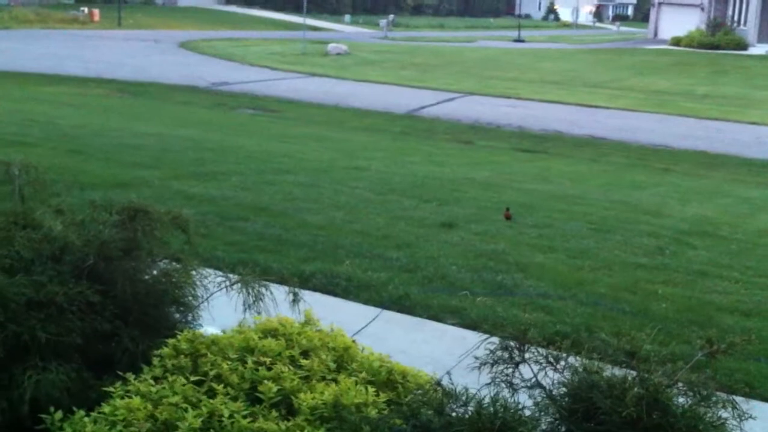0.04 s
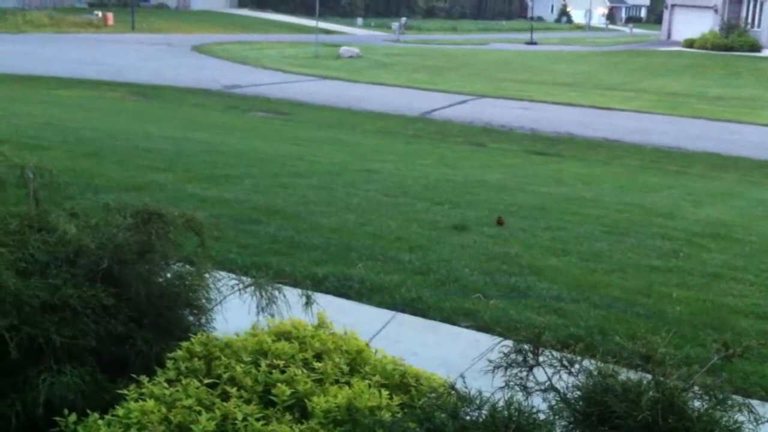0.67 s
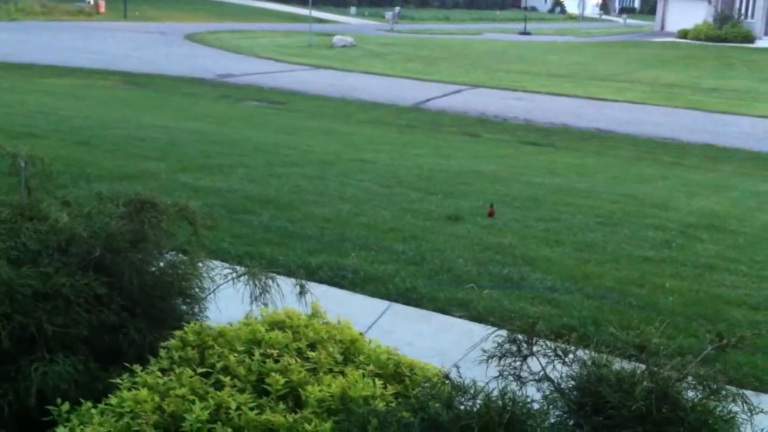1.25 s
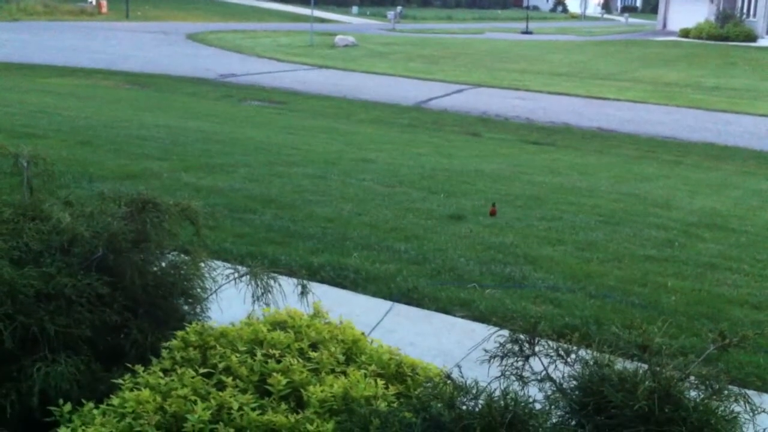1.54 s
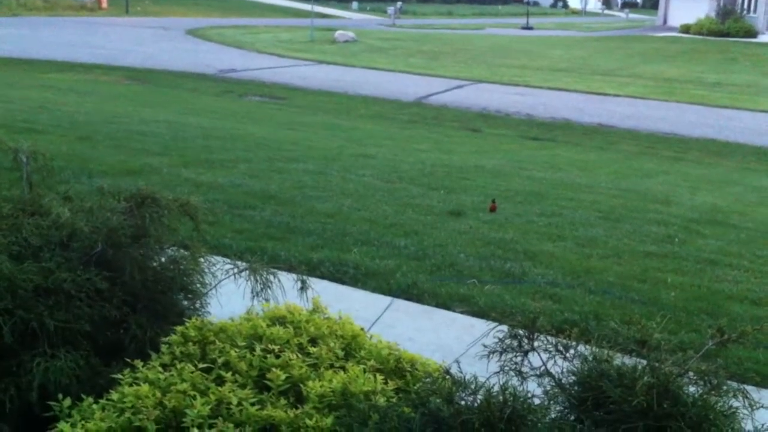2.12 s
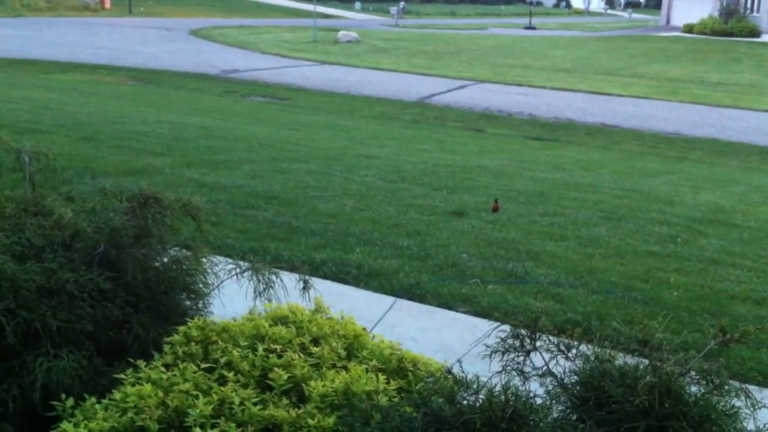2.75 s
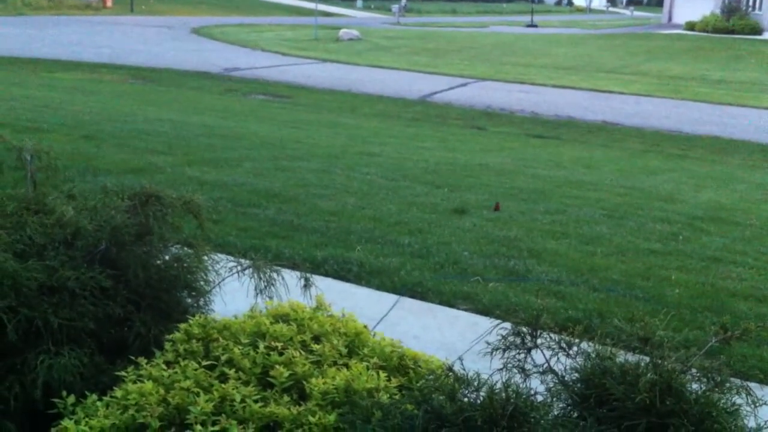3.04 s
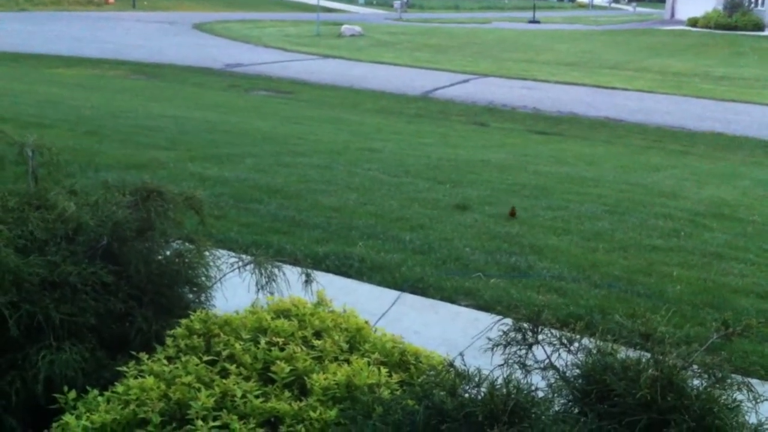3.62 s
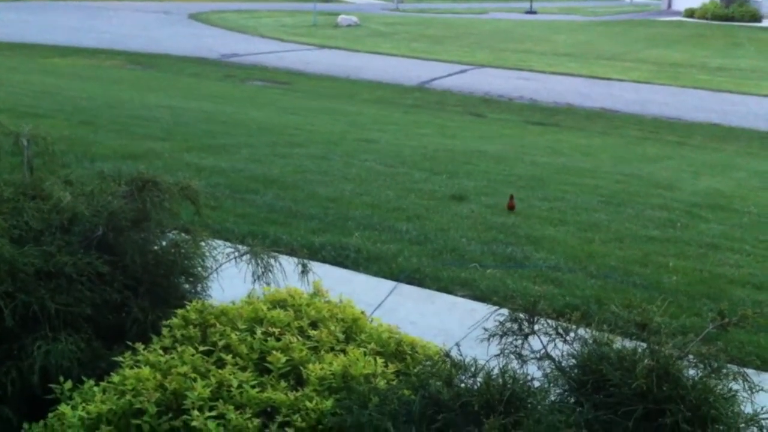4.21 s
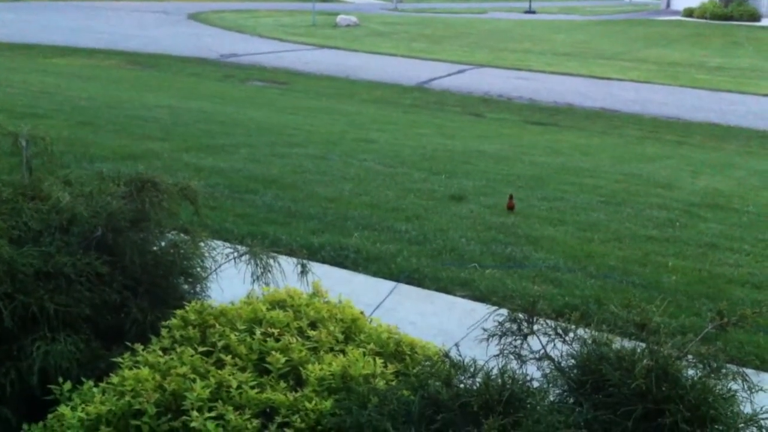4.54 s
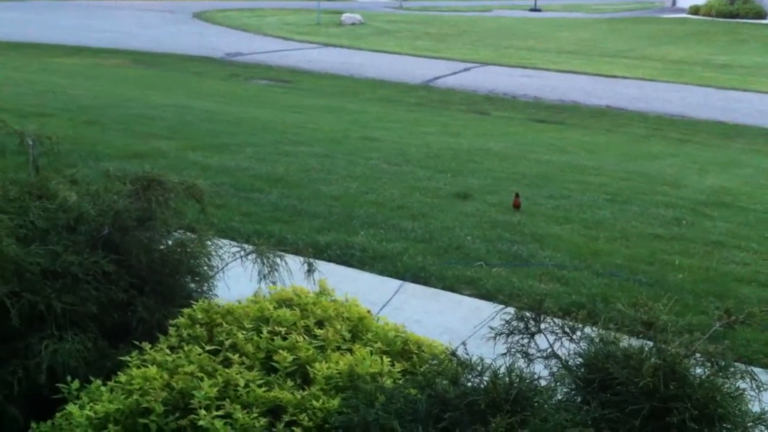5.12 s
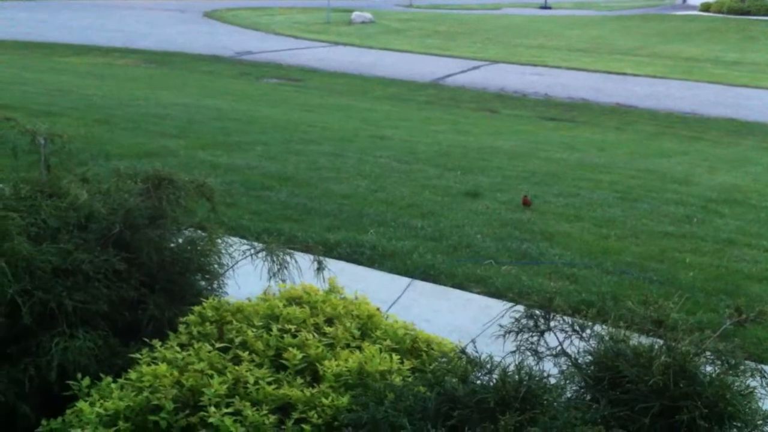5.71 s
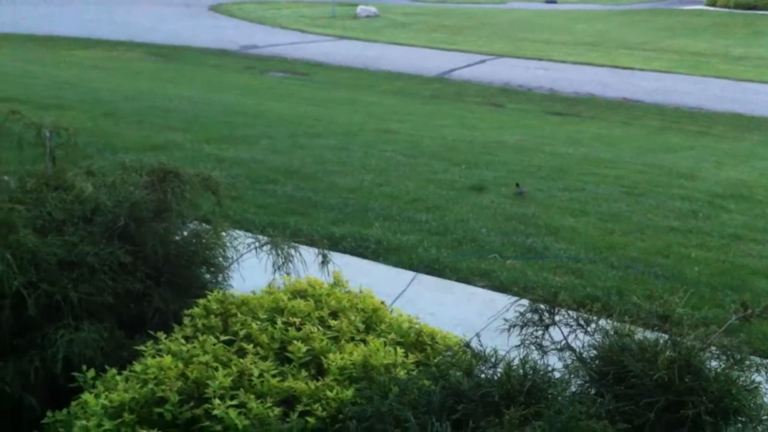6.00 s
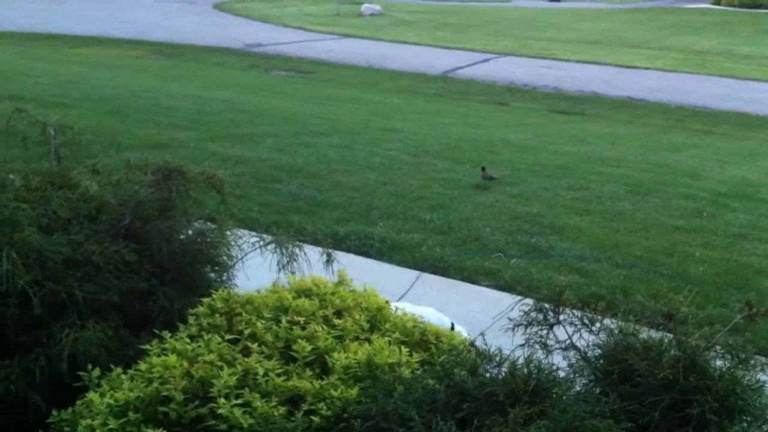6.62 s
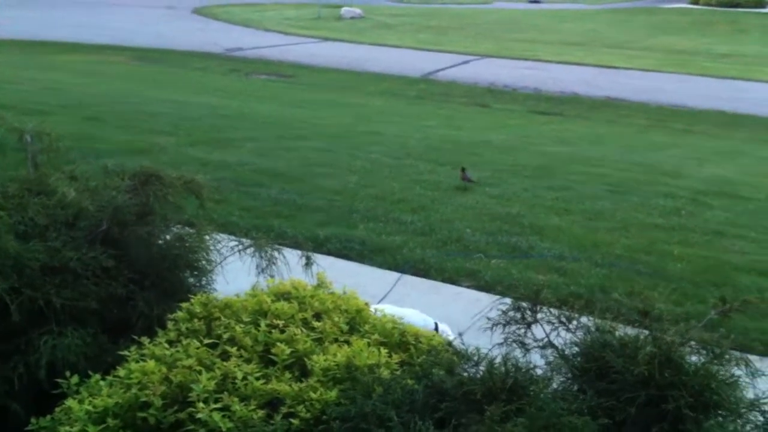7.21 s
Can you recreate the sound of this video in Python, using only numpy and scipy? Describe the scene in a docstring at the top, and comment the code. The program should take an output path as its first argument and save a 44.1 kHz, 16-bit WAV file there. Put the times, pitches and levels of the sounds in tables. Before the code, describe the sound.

A robin gives sharp, high scolding calls and softer low clucks over a faint outdoor hush, with a few small metallic ticks.

```python
"""An outdoor hush comes first, with far traffic, far birds, a machine hum and a faint whine in it.
Over it a robin on a lawn scolds with five sharp "peek" calls and softer, low "tuk" notes. The two sides
of its syrinx oscillate at separate pitches; walls, shrubs and far house fronts reflect the sound.
Now and then a small metal part on a handheld device ticks and rings in its natural modes,
and near the end a finger bumps the device's body with a dull thud."""
import sys
import numpy as np
from scipy import signal
from scipy.fft import rfft, irfft, next_fast_len
from scipy.io import wavfile
from scipy.ndimage import map_coordinates

SR = 44100
rng = np.random.default_rng(int(sys.argv[2]) if len(sys.argv) > 2 else 0)


def store_wav(level_fs):
    """Save 16-bit WAV to argv[1]."""
    pcm = np.round(np.clip(np.atleast_2d(level_fs), -1, 1) * 32767)
    wavfile.write(sys.argv[1], SR, pcm.T.astype(np.int16))


N = 324576
TIME_S = np.arange(N) / SR


def amp(db):
    """Decibels to amplitude ratio."""
    return 10 ** (np.asarray(db) / 20)

def unit(x):
    """Scale to rms 1."""
    return x / np.sqrt(np.mean(x ** 2) + 1e-20)

def along(points, hz):
    """Interpolate (frequency_hz, value) points on a log frequency axis."""
    knots_hz, values = np.transpose(points)
    return np.interp(np.log(hz + 1), np.log(knots_hz + 1), values)

def curves(rows, t):
    """Interpolate each column after the first at the times t."""
    times, *columns = np.transpose(rows)
    return [np.interp(t, times, column) for column in columns]

def filtered(x, response):
    """Linear filtering: multiply the spectrum by a frequency response."""
    size = next_fast_len(len(x) + SR // 4)
    return irfft(rfft(x, size) * response(np.fft.rfftfreq(size, 1 / SR)), size)[:len(x)]

def coloured(x, colour):
    """Filter by a (frequency_hz, gain_db) curve."""
    return filtered(x, lambda hz: amp(along(colour, hz)))

def noise(colour, size):
    """Spectrally shaped noise of rms 1."""
    return unit(coloured(rng.standard_normal(size), colour))

def band(centre_hz, width_hz):
    """Noise of rms 1 through one resonance."""
    return unit(filtered(rng.standard_normal(N), lambda hz: 1 / (1 + ((hz - centre_hz) / width_hz) ** 2)))

def wobble(rate, size=N):
    """A smooth random curve with `rate` knots a second."""
    knots = rng.standard_normal(int(size * rate / SR) + 4)
    return map_coordinates(knots, [np.arange(size) * rate / SR])

def swell(t, centre_s, width_s):
    """A Gaussian rise and fall of height 1."""
    return np.exp(-((t - centre_s) / width_s) ** 2)

def phase_of(hz):
    """Phase is the time integral of frequency."""
    return 2 * np.pi * np.cumsum(hz) / SR

def add(track, start_s, x):
    """Superpose x on the track from start_s on."""
    start = max(round(start_s * SR), 0)
    track[start:start + len(x)] += x[:N - start]


# Spectrum of the outdoor air: frequency_hz, density_db
HUSH_SPECTRUM = [(15, -56), (25, -25), (37, -30.5), (96, -13.5), (144, -6.5), (183, -7.5), (600, -10.5),
                 (1270, -17), (3850, -22), (4770, -20), (5460, -22), (15600, -26.5)]

def hush():
    """Stationary broadband noise, strongest in the bass."""
    return amp(-66) * noise(HUSH_SPECTRUM, N)

# Loudness of a machine: time_s, level_db
HUM_LEVELS = [(0, -76), (4.5, -77.5), (5.0, -68.5), (5.6, -71.5), (6.3, -65.5), (7.36, -68.5)]

def machine_hum():
    """One low tone, slowly modulated in amplitude and frequency, swells late on."""
    hz = np.interp(TIME_S, [5.6, 6.5], [156, 158.3]) * (1 + 0.0022 * wobble(3.8))
    return amp(curves(HUM_LEVELS, TIME_S)[0] + wobble(4.0)) * np.sin(phase_of(hz))

def distant_tone(hz, waver, width_hz):
    """Multipath propagation smears a wavering tone into a narrow band of rms 1."""
    phase = phase_of(hz * (1 + waver * wobble(13)))
    return unit(wobble(width_hz) * np.sin(phase) + wobble(width_hz) * np.cos(phase))

def far_birds():
    """Twittering blurs over many paths into a high, flickering band."""
    return amp(-83 + 1.5 * wobble(19)) * distant_tone(4720, waver=0.022, width_hz=450)

# Glide of a far whine: time_s, pitch_hz, level_db
WHINE_GLIDE = [(.6, 2440, -92), (1.3, 2400, -85), (1.8, 2210, -78.5), (2.3, 2080, -85), (3.0, 2070, -100)]

def far_whine():
    """A faint falling tone, blurred by multipath propagation."""
    hz, db = curves(WHINE_GLIDE, TIME_S)
    return amp(db) * distant_tone(hz, waver=0.0087, width_hz=290)

# Far vehicles going by: centre_s, half_width_s, engine_db, tyre_db
VEHICLES = [(1.9, 0.43, -72.5, -90.5), (4.4, 0.33, -75.5, -114), (5.4, 0.23, -91, -69)]

def traffic():
    """Band-limited noise: a narrow engine drone and a wider tyre rush swell as vehicles pass."""
    drone = rush = amp(-81.5)
    for centre_s, width_s, engine_db, tyre_db in VEHICLES:
        nearness = swell(TIME_S, centre_s, width_s)
        drone = drone + amp(engine_db) * nearness
        rush = rush + amp(tyre_db) * nearness
    engines = drone * band(centre_hz=138, width_hz=7.3)
    tyres = rush * amp(1.1 * wobble(2.55)) * band(centre_hz=224, width_hz=83)
    return engines + tyres


# Contacts of the metal part: start_s, ring_gain_db, click_gain_db
CONTACTS = [(0.013, -75, -66), (.819, -51.5, -69), (1.043, -59, -69), (3.7255, -80, -71),
            (5.944, -36, -54.5), (6.0502, -40.5, -51.5)]
# Its natural modes: frequency_hz, relative_db, t60_s
METAL_MODES = [(7020, -31, .3), (12003, -5, 0.11), (12180, -6, 0.032)]
# Spectrum of a contact: frequency_hz, relative_db
CLICK_SPECTRUM = [(1500, -13), (5000, -2), (9000, -3), (12000, 6), (13200, -11), (15500, -10)]

def metal_ticks():
    """Impact excitation: each contact clicks and sets off exponentially decaying modes."""
    out, t = np.zeros(N), np.arange(SR // 3) / SR
    for start_s, ring_db, click_db in CONTACTS:
        ring = sum(amp(db - 60 * t / t60) * np.sin(2 * np.pi * hz * t) for hz, db, t60 in METAL_MODES)
        click = noise(CLICK_SPECTRUM, len(t)) * (amp(-60 * t / 0.015) + amp(-7 - 60 * t / 0.32))
        add(out, start_s, amp(ring_db) * ring + amp(click_db) * click)
    return out


def pitch_arch(side, t, creep_hz_per_s=4914, flick_s=0.003, slump_s=0.00243):
    """Tension sets pitch: it sweeps up, creeps, flicks to the top at t = 0 and plunges."""
    lead_s, rest_hz, held_hz, rise_s, flick_hz, plunge_s = side
    before, after = np.minimum(t, 0), np.maximum(t, 0)
    tension = np.tanh(np.maximum(before + lead_s, 0) / rise_s)
    sweep_hz = rest_hz + tension * (held_hz + creep_hz_per_s * before - rest_hz)
    slump = 1 - 0.16 * (1 - np.exp(-after / slump_s))
    return (sweep_hz + flick_hz * np.exp(before / flick_s)) * np.exp(-after / plunge_s) * slump

def roughened(hz, db, roughness, jitter, flutter_db):
    """Roughness is fast random modulation of pitch and level; returns amplitude and phase."""
    phase = phase_of(hz * (1 + jitter * roughness * wobble(1400, len(hz))))
    return amp(db + flutter_db * roughness * wobble(703.5, len(hz))), phase

# Response of throat and beak: frequency_hz, gain_db
VOCAL_TRACT = [(1400, -30), (1900, -26.5), (2600, -29), (3300, -17.5), (4000, -6.5), (5000, 0.5),
               (5600, -6), (6400, -17.5), (8200, -11), (9000, -11.5)]

def peek_voice(hz, t, lead_s, gain_db, roughness, attack_db_per_s=1491, release_db_per_s=2600):
    """Source and filter: the tone is loudest where it crosses the throat's resonance."""
    attack_db = attack_db_per_s * np.minimum(t + lead_s, 0)
    release_db = -release_db_per_s * np.maximum(t - 0.027, 0)
    db = -25 + gain_db + attack_db + release_db + along(VOCAL_TRACT, hz)
    slackness = np.interp(hz, [2060, 4280], [0.85, 0.06])  # rough when slack, clean when taut
    roughness = np.clip(roughness + slackness + 0.31 * (t > 0), 0, 1)  # rougher in the plunge
    return roughened(hz, db, roughness, jitter=0.0956, flutter_db=6.5)

# Arch of the syrinx's low side: lead_s, rest_hz, held_hz, rise_s, flick_hz, plunge_s
LOW_ARCH = (.051, 2150, 5170, .0092, 400, .054)

def low_whistle(t, drift_hz_per_s=30000, collapse_s=0.026):
    """The main oscillator drifts up before its sweep; loss of tension steepens its plunge."""
    drift_hz = drift_hz_per_s * np.minimum(t + LOW_ARCH[0], 0)
    collapse = 1 - 0.378 * np.clip(t / collapse_s, 0, 1) ** 4
    hz = np.maximum((pitch_arch(LOW_ARCH, t) + drift_hz) * collapse, 1)
    return peek_voice(hz, t, lead_s=0.063, gain_db=-1, roughness=0)

# Arch of the syrinx's high side: lead_s, rest_hz, held_hz, rise_s, flick_hz, plunge_s
HIGH_ARCH = (.0545, 3850, 8430, .0098, 610, .0215)

def high_whistle(t, stutter_s=0.0062, sag_db_per_s=97):
    """An onset transient: the upper oscillator makes false upsweeps, carries one through, then tires."""
    since = t + HIGH_ARCH[0]
    restarted = np.where(since < 0, since % stutter_s - HIGH_ARCH[0], t)
    gain_db = 1.5 * swell(since, stutter_s / 2, stutter_s) - sag_db_per_s * since
    return peek_voice(pitch_arch(HIGH_ARCH, restarted), t, lead_s=0.051, gain_db=gain_db, roughness=0.043)

# Sharp calls: top_s, pitch_ratio, length_ratio, rise_db, hold_db, fall_db, upper_voice_db
PEEK_CALLS = [(.272, 0.99, 1.03, -2, 0, -1.5, -2), (2.9363, 0.99, 0.96, -4.5, 1, -2, -3),
              (4.4566, 1.008, 0.93, -2, 1, -2, 0), (6.384, 1.002, 1.07, -2.5, 3.5, -6, -4),
              (7.049, .99, 1.03, -2, 1, -3, -0.5)]
# Rasps that open and close a call: offset_from_top_s, level_db, half_width_s
RASP_BURSTS = [(-.052, -40, 0.01), (.008, -41, 0.0068)]
# Spectrum of the rasp: frequency_hz, relative_db
RASP_SPECTRUM = [(1200, -17.5), (1800, -10), (3100, -14), (4200, 8.5), (5600, 11.5), (7000, 0.5),
                 (8300, -7), (9800, -26), (11800, 1), (13500, -32), (15500, -8.5)]

def peeks():
    """Nonlinear coupling of two arching tones adds harmonics and sum and difference tones."""
    out, clock = np.zeros(N), np.arange(-SR // 10, SR // 20) / SR
    for top_s, pitch, length, rise_db, hold_db, fall_db, upper_db in PEEK_CALLS:
        t = np.where(clock < 0, clock / length, clock)  # the arch varies in length, the plunge does not
        low_amp, low = low_whistle(t)
        high_amp, high = high_whistle(t)
        low, high = pitch * low, pitch * high  # scaling phase transposes the voices
        high_amp = high_amp * amp(upper_db)
        tones = low_amp * np.sin(low) + high_amp * np.sin(high)
        harmonics = low_amp * (amp(-31) * np.sin(2 * low) + amp(-34) * np.sin(3 * low))
        coupling = low_amp * high_amp / (low_amp + high_amp)
        combination = (amp(-14.5) * np.sin(low + high) + amp(-18) * np.sin(2 * high - low)
                       + amp(-31) * np.sin(high - low))
        bursts = sum(amp(db) * swell(t, at_s, width_s) for at_s, db, width_s in RASP_BURSTS)
        held = (t > RASP_BURSTS[0][0]) & (t < 0)
        rasp = (bursts + amp(-52) * held) * noise(RASP_SPECTRUM, len(t))
        effort = amp(np.interp(t, [-0.038, -0.02, 0.004], [rise_db, hold_db, fall_db]))
        call = effort * (tones + harmonics + coupling * combination + rasp)
        add(out, top_s + clock[0], with_near_echoes(call))
    return out


def diffuse_tail(t60s, build_s):
    """Reverberation of energy 1 in which each frequency decays at its own rate."""
    hz, t, spectra = signal.stft(rng.standard_normal(SR // 2), SR, nperseg=256)
    fade = amp(-60 * t / along(t60s, hz)[:, None]) * (1 - np.exp(-t / build_s))
    echo = signal.istft(spectra * fade, SR, nperseg=256)[1]
    return echo / np.linalg.norm(echo)

# Decay among near walls and shrubs: frequency_hz, t60_s
NEAR_DECAY = [(200, 0.33), (1800, 0.23), (3500, 0.31), (5000, 0.23), (9000, 0.22), (15000, 0.13)]
# Colour of their echo: frequency_hz, gain_db
NEAR_COLOUR = [(1500, 1), (2400, 6), (3300, 5.5), (4200, -6.5), (5200, -3.5), (8400, 2.5), (14000, 1)]

def with_near_echoes(call, wall_s=0.0074, wall_db=-14):
    """Direct sound, scattering and one wall reflection, new each call as the bird moves its head."""
    scattered = signal.fftconvolve(call, diffuse_tail(NEAR_DECAY, build_s=0.004))
    out = amp(-8) * coloured(scattered, NEAR_COLOUR)
    add(out, 0, call)
    add(out, wall_s * (1 + 0.05 * rng.standard_normal()), amp(wall_db) * call)
    return out

# Reflections from far house fronts: delay_s, relative_db
HOUSE_ECHOES = [(.248, -45), (0.304, -43.5), (.455, -49.5)]
# Directivity as the bird turns toward the houses: time_s, gain_db
BIRD_FACING = [(5.6, -4), (6.35, 4), (7.05, -2)]

def with_far_echoes(calls, trees_t60_s=2.0):
    """Trees and house fronts reflect the calls late; air absorption takes the top treble."""
    t = np.arange(2 * SR) / SR
    trees = amp(-60 * t / trees_t60_s) * rng.standard_normal(len(t))
    response = amp(-39) * trees / np.linalg.norm(trees)
    for delay_s, db in HOUSE_ECHOES:
        front = np.exp(-np.abs(t - delay_s) / 0.015) * rng.standard_normal(len(t))
        response += amp(db) * front / np.linalg.norm(front)
    sent = calls * amp(curves(BIRD_FACING, TIME_S)[0])
    path_colour = [(4200, 10), (5100, 5), (6200, 14), (8500, 4), (15000, -24)]
    return calls + coloured(signal.fftconvolve(sent, response)[:N], path_colour)


def tuk_voice(contour, t, jitter, flutter_db):
    """One side of the syrinx follows a contour and fades exponentially outside it."""
    outside_s = np.maximum(contour[0][0] - t, 0) + np.maximum(t - contour[-1][0], 0)
    amplitude, phase = roughened(*curves(contour, t), jitter, flutter_db)
    return amplitude * np.exp(-outside_s / 0.003), phase

# Soft notes: start_s, pitch_ratio, gain_db
TUK_NOTES = [(0.53, 1.04, 2.5), (.839, 1.005, -2.5), (3.194, 0.99, 1), (3.61, .99, 1), (5.887, 1.006, 0)]
# Low side of the syrinx: offset_s, pitch_hz, level_db, roughness_ratio
TUK_LOW_CONTOUR = [(-.001, 1538, -68, 0.01), (.004, 1707, -58, 0.08), (.014, 1826, -53.5, 0.07),
                   (.022, 1706, -52, 0.04), (.028, 1520, -54, 0), (.036, 1170, -62, 0.4)]
# High side of the syrinx: offset_s, pitch_hz, level_db, roughness_ratio
TUK_HIGH_CONTOUR = [(0, 2196, -63, 0.22), (.008, 2956, -67.5, 0.16), (.019, 3115, -67.5, 0.15),
                    (.029, 2537, -63.5, 0.59), (.035, 1850, -49.5, 0.33), (.044, 1520, -57.5, 0.32)]

def tuks():
    """Biphonation: one voice makes a low, soft arch and the second plunges into its range at the end."""
    out, t = np.zeros(N), np.arange(-SR // 100, SR // 14) / SR
    rasp_colour = [(900, -16), (1500, 6), (3100, -11), (3600, -6), (8500, -14),
                   (12000, -12), (15500, -17)]
    for start_s, pitch, db in TUK_NOTES:
        low_amp, low = tuk_voice(TUK_LOW_CONTOUR, t, jitter=0.15, flutter_db=7)
        high_amp, high = tuk_voice(TUK_HIGH_CONTOUR, t, jitter=0.2, flutter_db=4)
        tones = low_amp * np.sin(pitch * low) + high_amp * np.sin(pitch * high)
        rasp = amp(-11) * low_amp * noise(rasp_colour, len(t))
        add(out, start_s + t[0], amp(db) * with_near_echoes(tones + rasp))
    return out


# Finger touches on the device: centre_s, peak_db
TOUCHES = [(6.125, -42.5), (6.1376, -34.5)]
# Response of its body: frequency_hz, relative_db
BODY_RESPONSE = [(45, -35), (100, -7), (155, 6), (300, 1.5), (680, 3.5), (1000, -13), (1300, -17),
                 (1700, -11), (2200, -18), (6000, -43), (15000, -58)]

def finger_bumps():
    """A heavily damped body answers a finger with a dull pulse and no ring."""
    hz = np.fft.rfftfreq(SR // 10, 1 / SR)
    pulse = np.fft.fftshift(irfft(amp(along(BODY_RESPONSE, hz))))
    out = np.zeros(N)
    for centre_s, peak_db in TOUCHES:
        add(out, centre_s - len(pulse) / SR / 2, amp(peak_db) * pulse / pulse.max())
    return out


def scene():
    """Superposition of the robin, the small handling noises and the neighbourhood, in mono."""
    robin = with_far_echoes(peeks() + tuks())
    handling = metal_ticks() + finger_bumps()
    neighbourhood = hush() + machine_hum() + far_birds() + far_whine() + traffic()
    return (robin + handling + neighbourhood)[None]

def record(dry):
    """Band limiting: an ideal low-pass filter removes the highest treble."""
    cutoff_hz = 15780
    return np.array([filtered(channel, lambda hz: hz < cutoff_hz) for channel in dry])


dry = scene()
out = record(dry)
store_wav(out)
```